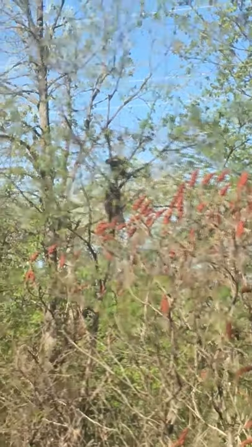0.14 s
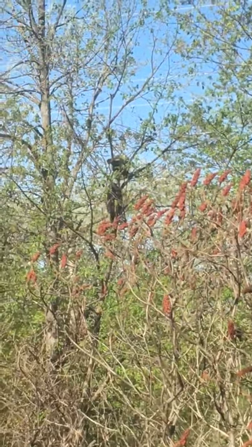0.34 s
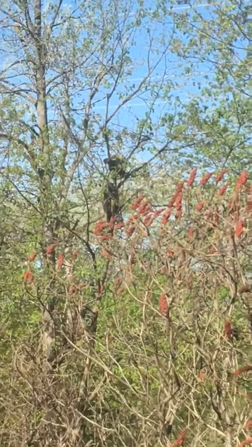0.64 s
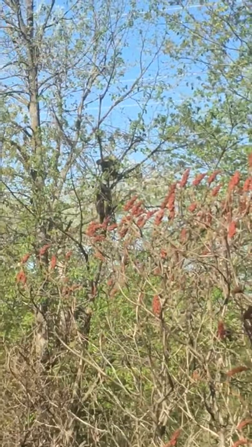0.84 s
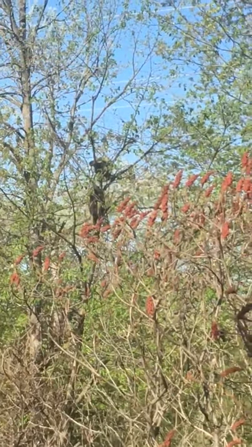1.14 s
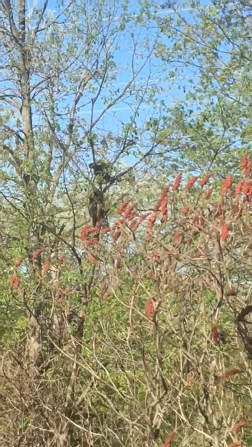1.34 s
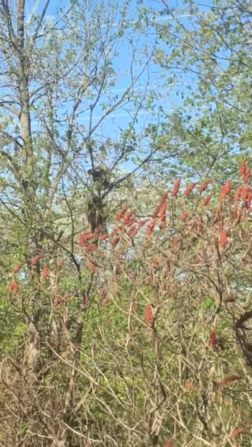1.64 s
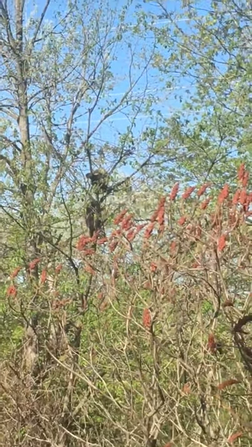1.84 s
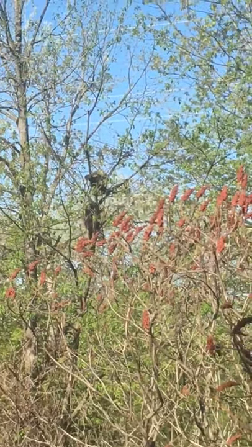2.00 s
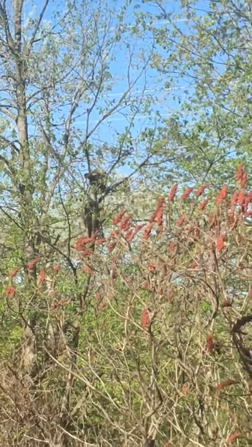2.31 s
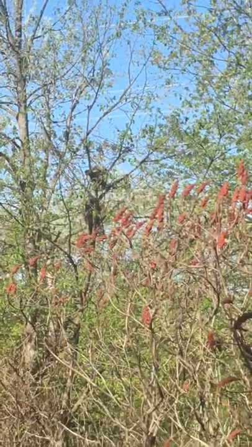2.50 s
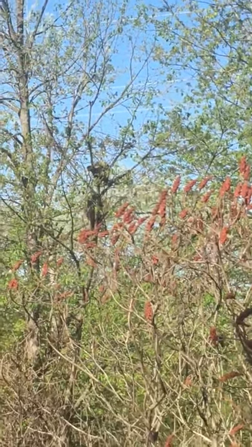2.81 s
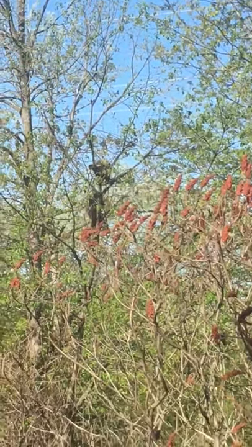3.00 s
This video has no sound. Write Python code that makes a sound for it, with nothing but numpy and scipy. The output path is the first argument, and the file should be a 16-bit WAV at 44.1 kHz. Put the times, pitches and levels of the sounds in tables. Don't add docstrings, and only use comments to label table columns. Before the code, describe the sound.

Two plaintive porcupine cries outdoors, the second breaking into rough, stuttering creaks, with faint bird chips

```python
import sys
import numpy as np
from scipy import signal
from scipy.fft import rfft, irfft
from scipy.io import wavfile

SR = 44100
rng = np.random.default_rng(int(sys.argv[2]) if len(sys.argv) > 2 else 0)


def level_to_linear(level):
    exponent = np.asarray(level, float) / 20
    return 10 ** exponent


def transcribe(u):
    v = np.clip(np.atleast_2d(u).T, -1, 1)
    q = np.round(v * 32767).astype(np.int16)
    wavfile.write(sys.argv[1], SR, q)


N = 138915


def rms_one(x):
    return x / np.sqrt(np.mean(x ** 2) + 1e-20)


def drift(rate_hz):
    r = np.exp(-80 * np.pi * rate_hz / SR)
    noise = rng.standard_normal(N // 40 + 2002)
    slow = signal.lfilter([1], [1, -2 * r, r * r], noise)[2000:]
    return np.interp(np.arange(N) / 40, np.arange(len(slow)), rms_one(slow))


def resonate(x, hz, width_hz):
    r = np.exp(-np.pi * width_hz / SR)
    top = [(1 - r * r) / 2, 0, (r * r - 1) / 2]
    bottom = [1, -2 * r * np.cos(2 * np.pi * hz / SR), r * r]
    return signal.lfilter(top, bottom, x + 1e-18)


# f/Hz, level/dB
AIR_COLOUR = [(15, -59), (25, -12), (89, 3), (227, -15.5), (289, -3), (340, -14.5), (762, -14.5),
              (1410, -19.5), (15500, -39.5)]


def air():
    level_db = -67
    hz, db = np.transpose(AIR_COLOUR)
    f = np.arange(N // 2 + 1) * SR / N + 1
    colour = level_to_linear(np.interp(np.log(f), np.log(hz), db))
    scale = np.sqrt(np.sum(colour[f > 300] ** 2) * 2 / N)
    noise = irfft(rfft(rng.standard_normal(N)) * colour, N) / scale
    return level_to_linear(level_db + 0.11 * drift(14.0)) * noise


# t/s, level/dB
CAR_LEVELS = [
    (0, -68),
    (.2, -80),
    (1.2, -89),
    (2.8, -87),
    (3.0, -73),
    (3.15, -70),
]


def cars():
    s, db = np.transpose(CAR_LEVELS)
    roar = rms_one(resonate(rng.standard_normal(N), 1410, 220))
    return level_to_linear(np.interp(np.arange(N) / SR, s, db)) * roar


# f/Hz, level/dB (rms), wobble/dB
MOTOR_TONES = [(71.7, -57, 2.0), (143.4, -68, 4.0), (180, -70, 4.0), (218, -77, 4.0), (287, -69, 1.5)]


def drone():
    throb_s, throb_top_s, throb_db, throb_from_s = .645, .88, 9, .8
    t = np.arange(N) / SR
    turns = np.cumsum(1 + 0.00973 * drift(2.41)) / SR
    throb = throb_db * (np.cos(2 * np.pi * (t - throb_top_s) / throb_s) - 1) / 2
    throb = throb - throb_db * np.clip((throb_from_s - t) * 10, 0, 1)
    out = 0
    for hz, db, wobble_db in MOTOR_TONES:
        phase = 2 * np.pi * (hz * turns + rng.random())
        level_db = db + 2.0 + wobble_db * drift(9.5) + throb * (hz > 250)
        out = out + level_to_linear(level_db) * np.sin(phase)
    return out


def wood(x):
    level_db, delay_s, low_t60_s, high_t60_s = -7.5, 0.0007, 0.56, .22
    t = np.arange(SR) / SR
    noise = rng.standard_normal(SR) * np.clip(t / delay_s, 0, 1)
    low = signal.sosfiltfilt(signal.butter(2, 6200, fs=SR, output="sos"), noise)
    tail = low * level_to_linear(-60 * t / low_t60_s) + (noise - low) * level_to_linear(-60 * t / high_t60_s)
    tail = signal.sosfilt(signal.butter(1, 22000, fs=SR, output="sos"), tail)
    return level_to_linear(level_db) * signal.fftconvolve(x, tail / np.linalg.norm(tail))[:N]


# t/s, peak level/dB, ring f/Hz, time to fall 60 dB/s
TWIG_TICKS = [
    (.2115, -43, 630, 0.0074),
    (.2125, -52, 1900, .004),
    (.22, -45, 2940, 0.0037),
    (.2258, -41, 1900, 0.0059),
    (.241, -40, 1050, 0.0047),
    (.247, -61, 800, 0.0075),
    (1.759, -58, 2400, .004),
    (3.1025, -50, 2540, 0.0071),
]


def twigs():
    out = np.zeros(N)
    t = np.arange(1200) / SR
    for s, db, hz, t60_s in TWIG_TICKS:
        ring = np.sin(2 * np.pi * hz * t)
        crack = level_to_linear(-7.5) * signal.lfilter([.3], [1, -.8], rng.standard_normal(len(t)))
        fade = np.clip(t / 0.000088, 0, 1) * level_to_linear(db - 60 * t / t60_s)
        start = int(s * SR)
        out[start:start + len(t)] += (ring + crack) * fade
    return out


def whistle(start, s, hz, db, overtone_db):
    t = np.arange(N) / SR - start
    phase = 2 * np.pi * np.cumsum(np.interp(t, s, hz)) / SR
    edge = np.clip(np.minimum(t, s[-1] - t) / 0.002, 0, 1)
    tone = np.sin(phase) + level_to_linear(overtone_db) * np.sin(2 * phase)
    return edge * level_to_linear(np.interp(t, s, db) + 5) * tone


# t/s from its start, f/Hz, level/dB
CHIP_PATH = [
    (0, 7600, -8),
    (.005, 7870, -3),
    (.012, 7780, 0),
    (.019, 6900, 2),
    (.024, 5400, -4),
    (.030, 4500, 6),
    (.035, 3700, -10),
]
# t/s, level/dB, pitch factor
NEAR_CHIPS = [
    (.393, -61, .985),
    (1.347, -58, 1.0),
    (2.243, -61, .99),
]
# t/s, length/s, from f/Hz, to f/Hz, level/dB
FAR_SLURS = [
    (1.05, .08, 6700, 5800, -84),
    (1.178, .03, 6400, 4200, -82),
    (1.265, .03, 4300, 5400, -84),
    (1.287, .025, 2700, 3700, -70),
    (.33, .05, 2980, 2900, -80),
]


def birds():
    out = 0
    s, hz, db = np.transpose(CHIP_PATH)
    for start, level_db, factor in NEAR_CHIPS:
        out = out + whistle(start, s, hz * factor, db + level_db, -21)
    for start, length, first, last, level_db in FAR_SLURS:
        path_s = [0, .6 * length, length]
        path_hz = [first, .3 * first + .7 * last, last]
        out = out + whistle(start, path_s, path_hz, [level_db - 6, level_db, level_db - 4], -40)
    return out


def tract(x, peaks, edges_hz):
    band = signal.butter(2, edges_hz, "band", fs=SR, output="sos")

    def shape(v):
        total = 0
        for k, (hz, width_hz, db) in enumerate(peaks):
            total = total + (-1) ** k * level_to_linear(db) * resonate(v, hz, width_hz)
        return signal.sosfilt(band, total)

    return shape(x) / np.linalg.norm(shape(signal.unit_impulse(4096)))


def clicks(s, size):
    fine = np.zeros(N * 8)
    np.add.at(fine, (s * SR * 8).astype(int), size * 8)
    return signal.resample_poly(fine, 1, 8)


def sung(rows):
    s, hz, db, bright_db, rough = np.transpose(rows)
    t = np.arange(s[0], s[-1], 1 / SR)
    turns = np.cumsum(np.interp(t, s, hz)) / SR
    at = np.interp(np.arange(int(turns[-1]) + 1), turns, t)
    period = 1 / np.interp(at, s, hz)
    ring_db = np.interp(at, s, db) + 10 * np.log10(SR * period)
    snap_db = ring_db + np.interp(at, s, bright_db)
    return np.transpose([at, period, ring_db, snap_db, np.interp(at, s, rough)])


def creak(start, length, rate, snap_db, weak_db=0, change_db=0):
    k = np.arange(int(length * rate) + 1)
    snap = snap_db + weak_db * (k % 2) + change_db * k / max(k[-1], 1)
    ring = -23 + 0.27 * (snap + 36) + 2.5 * (start - 2.4)
    return np.transpose([start + k / rate, 1 / rate + 0 * k, ring, snap + 9, .11 + 0 * k])


# t/s, f/Hz, level/dB, brightness/dB, roughness/0-1
FIRST_WHINE = [
    (.399, 658.6, -50, -12, 0),
    (.424, 698.2, -42.5, -5, 0),
    (.5, 673.7, -41, -1, 0.04),
    (.54, 589.4, -42.5, -4.5, 0.14),
    (.59, 470.8, -41, -5.5, 0.1),
    (.618, 480.5, -44.5, -3.5, 0.09),
    (.65, 416.1, -43.5, -6, 0.11),
    (.684, 358.4, -53, -9, 0.08),
    (.714, 321.6, -51, -10, 0.08),
]
SOFT_MOAN = [
    (.714, 319.8, -55, -6, 0.076),
    (0.763, 283.2, -51, -16, 0.046),
    (0.8, 295.2, -55.5, -11, 0.036),
    (0.853, 294.2, -53.5, -17, 0.086),
    (0.882, 280.2, -51.5, -20, 0.076),
    (.925, 312.3, -54.5, -12, 0.036),
    (0.978, 319, -53, -15.5, 0.064),
    (1.009, 291.8, -52, -18.5, 0.21),
    (1.041, 268, -76, 4, 0.089),
]
SECOND_WHINE = [
    (1.803, 663.4, -49, -10, 0.02),
    (1.832, 699.7, -43.5, -7.5, 0.014),
    (1.857, 648.5, -41, -4, 0.017),
    (1.894, 641, -45, -1, 0.013),
    (1.936, 477.7, -42.5, -4, 0.061),
    (1.984, 487.4, -40.5, -5, 0.041),
    (2.012, 443.8, -44.5, -4.5, 0.12),
    (2.048, 428.5, -43.5, -6, 0.15),
    (2.062, 425, -66, 6, 0.26),
]
LOW_GROWL = [
    (2.1468, 196.5, -44, -2.5, .07),
    (2.153, 197.9, -45, -1.5, .06),
    (2.207, 210.3, -44.5, -2, .05),
    (2.239, 215.2, -43.5, -2, .07),
    (2.2582, 209, -44.5, -5, .12),
]
# t/s, length/s, rate f/Hz, snap level/dB, weak closure level/dB
LIMPING_CREAK = [
    (2.0626, .03, 207, -39, -4),
    (2.1044, .0025, 500, -37, 0),
    (2.1103, .006, 175, -34, -1),
    (2.1258, .001, 260, -36, 0),
    (2.2749, .06, 224.5, -31, -13),
    (2.4722, .046, 225, -30, -13),
    (2.522, .002, 220, -36, 0),
    (2.5309, .034, 218, -31, -14),
]
# t/s, length/s, rate f/Hz, snap level/dB, change over burst/dB
CREAK_BURSTS = [(2.1296, .011, 190, -37, 3), (2.1374, .006, 190, -40, 1), (2.2612, .01, 215, -33, -8),
                (2.338, .005, 235, -40, -5), (2.3585, .002, 240, -38, 0), (2.3746, .041, 248, -47, 7),
                (2.4205, .005, 230, -34, -7), (2.4346, .009, 245, -41, -2), (2.451, .018, 245, -43, 4),
                (2.588, .009, 248, -38, 0), (2.6058, .013, 250, -43, 10), (2.6311, .005, 228, -35, 1),
                (2.6488, .005, 240, -34, 2), (2.6646, .009, 247, -42, 5), (2.6847, .013, 245, -40, 0),
                (2.7087, .011, 480, -40, 3), (2.7307, .01, 215, -39, -2), (2.7524, .011, 200, -41, -4),
                (2.781, .01, 212, -37, 0), (2.798, .013, 425, -36, -6)]


def closures():
    runs = [sung(rows) for rows in (FIRST_WHINE, SOFT_MOAN, SECOND_WHINE, LOW_GROWL)]
    runs += [creak(*row[:4], weak_db=row[4]) for row in LIMPING_CREAK]
    runs += [creak(*row[:4], change_db=row[4]) for row in CREAK_BURSTS]
    return np.vstack(runs).T


# f/Hz, width/Hz, level/dB
WHINE_THROAT = [(545, 1200, -19), (1231, 89, -1.5), (1677, 161, 5), (2220, 690, -8)]
GROWLING_THROAT = [(800, 93, -15.5), (1224, 78, -4.5), (1720, 128, 8), (2060, 294, 1.5)]
CREAK_THROAT = [(500, 145, -19), (749.4, 56, -16), (1199.5, 173, -10.5), (1733, 115, 8), (2062, 590, -1)]
# f/Hz, width/Hz, level/dB
MOUTH_OPENING = [(2780, 300, 2), (3300, 300, -14), (4150, 250, 2), (4800, 400, -24)]
MOUTH_OPEN = [(2948, 260, 2), (3280, 250, 2), (3830, 740, -0.5), (4490, 550, 0.5), (4980, 730, -4),
              (5820, 140, -12)]
MOUTH_CREAKING = [(2750, 500, -3), (3900, 2000, 2)]
# f/Hz, width/Hz, level/dB
EARLY_HISS = [(6900, 1000, -2), (8100, 1400, 0), (9400, 900, -1), (10850, 700, -3), (13200, 2200, -4)]
CLOSED_HISS = [(6244, 770, -8), (7360, 660, -1), (8440, 1160, -6.5), (10000, 960, -9), (12000, 1500, -13)]
# lower f/Hz, upper f/Hz
VOICE_BANDS = [(250, 1850), (2300, 4740), (6000, 10340)]
MOUTH_OPEN_AT = [
    .505,
    1.86,
]


def porcupine():
    s, period, ring_db, snap_db, rough = closures()
    tight, tired, closing = s > 2.06, s > 2.335, s > 2.525
    opening = 0
    for end in MOUTH_OPEN_AT:
        opening = opening + np.clip((end - s) / .04, 0, 1) * (s > end - .2)
    hiss_db = snap_db + np.where(tired, -17, np.where(tight, -17.5, -18))

    rough = np.clip(rough, 0, 1)
    chance = rng.standard_normal((len(s), 3))
    s = s + .08 * rough * period * chance[:, 0]
    ring = level_to_linear(ring_db + rough * 6 * chance[:, 1])
    snap_shake_db = rough * 9 * chance[:, 2]
    snap, hiss = level_to_linear(snap_db + snap_shake_db), level_to_linear(hiss_db + snap_shake_db)

    throat_stages = ((~tight, WHINE_THROAT), (tight & ~tired, GROWLING_THROAT), (tired, CREAK_THROAT))
    mouth_stages = ((opening, MOUTH_OPENING), (~tight * (1 - opening), MOUTH_OPEN), (tight, MOUTH_CREAKING))
    hiss_stages = ((~closing, EARLY_HISS), (closing, CLOSED_HISS))
    parts = ((ring, -24, throat_stages), (snap, -10, mouth_stages), (hiss, 8, hiss_stages))

    noise = rng.standard_normal(N)
    puff = np.exp(-np.arange(600) / 110.0) / 7.4
    out = 0
    for (size, breath_db, stages), edges_hz in zip(parts, VOICE_BANDS):
        for when, peaks in stages:
            breath = noise * signal.oaconvolve(clicks(s, when * size * np.sqrt(rough)), puff)[:N]
            source = clicks(s, when * size) + level_to_linear(breath_db) * breath
            out = out + tract(source, peaks, edges_hz)
    return out


def scene():
    background = air() + cars() + drone()
    song, cry = birds(), porcupine()
    echo = wood(cry + level_to_linear(6) * song)
    return (background + echo + twigs() + song + cry)[None]


def low_pass(x):
    return signal.sosfilt(signal.butter(12, 15680, fs=SR, output="sos"), x)


def record(dry):
    return low_pass(dry)


dry = scene()
out = record(dry)
transcribe(out)
```